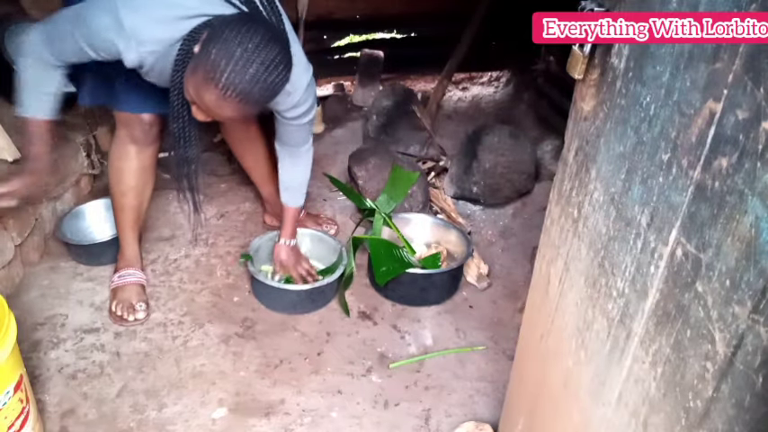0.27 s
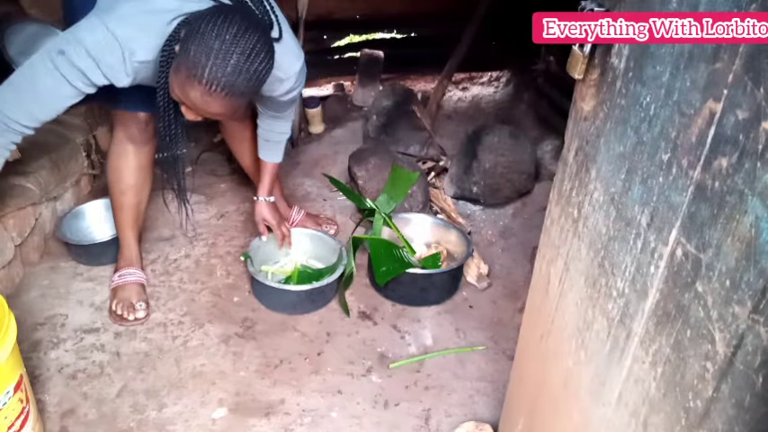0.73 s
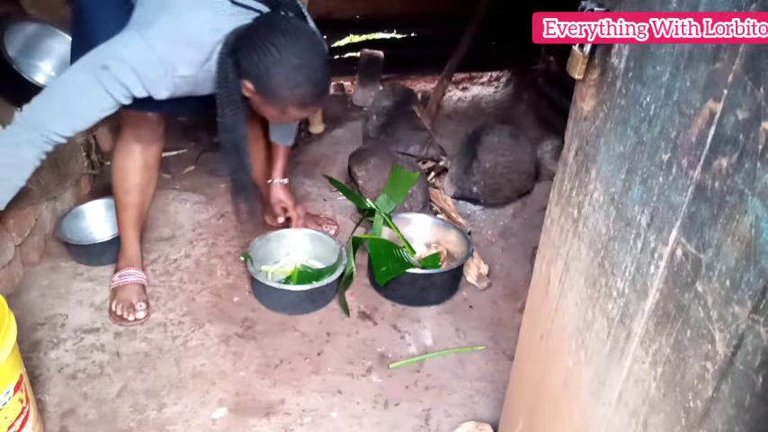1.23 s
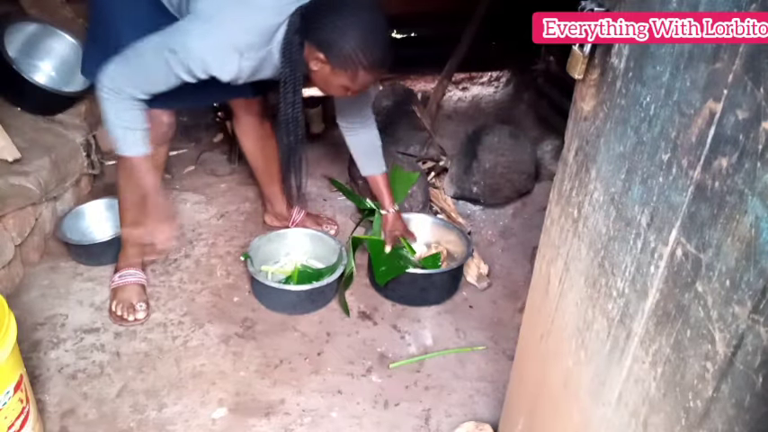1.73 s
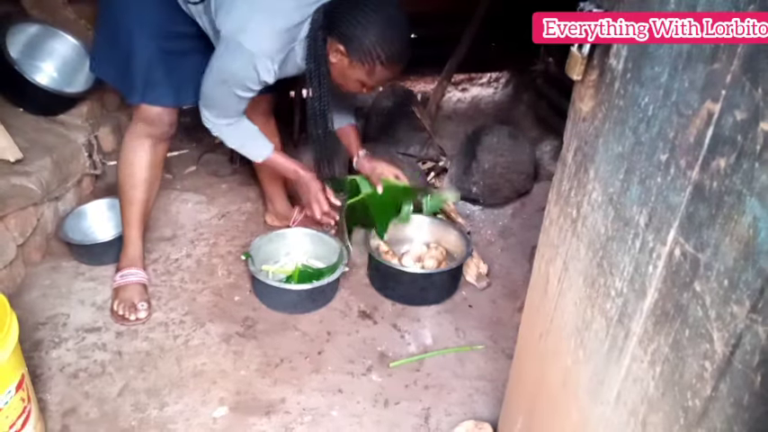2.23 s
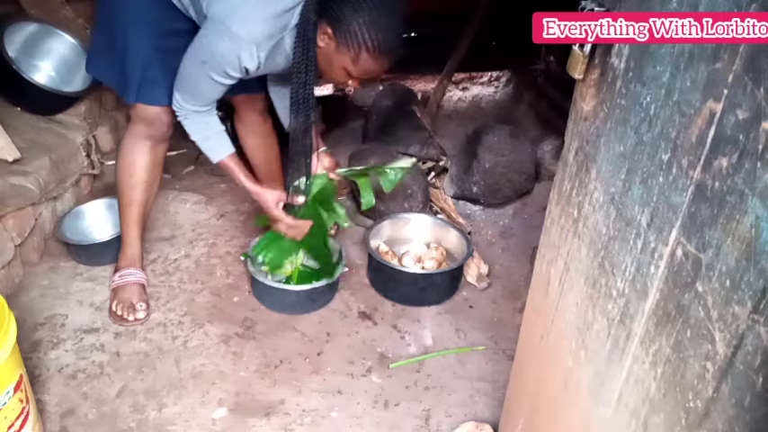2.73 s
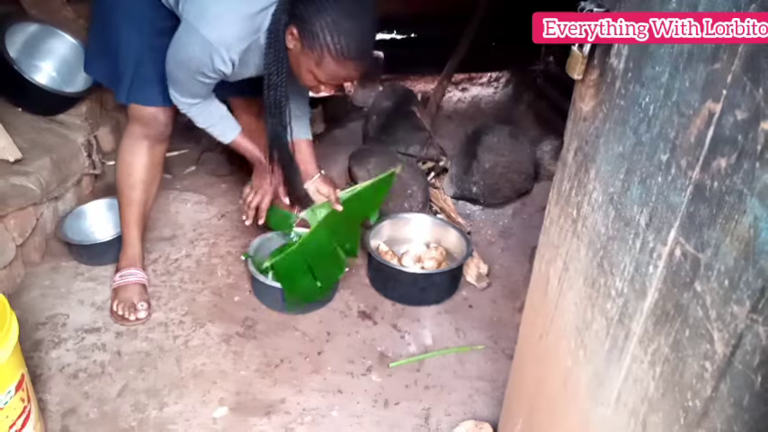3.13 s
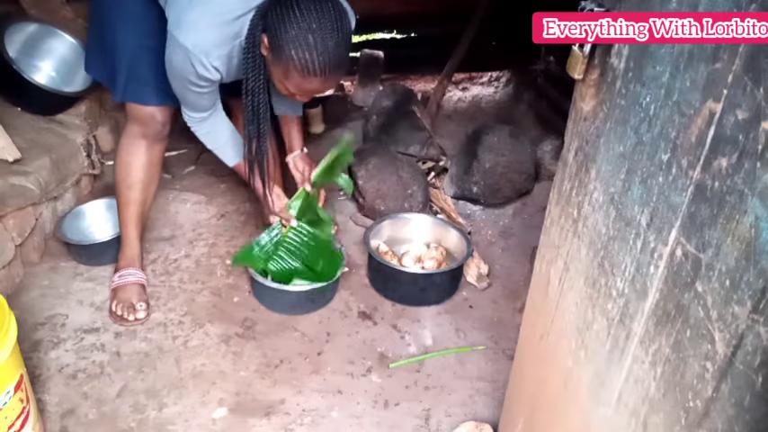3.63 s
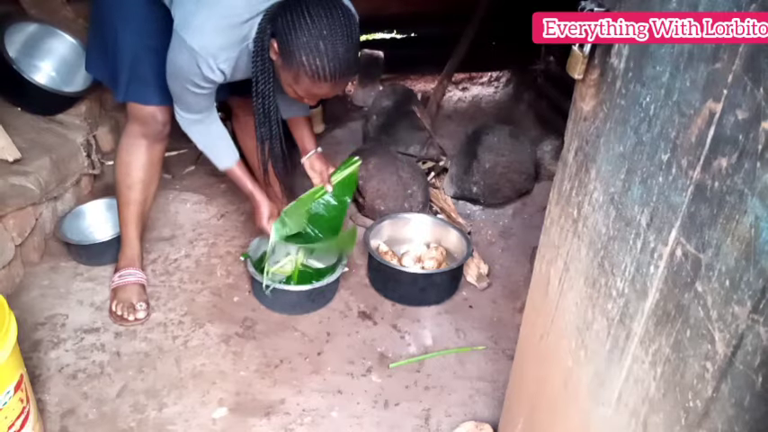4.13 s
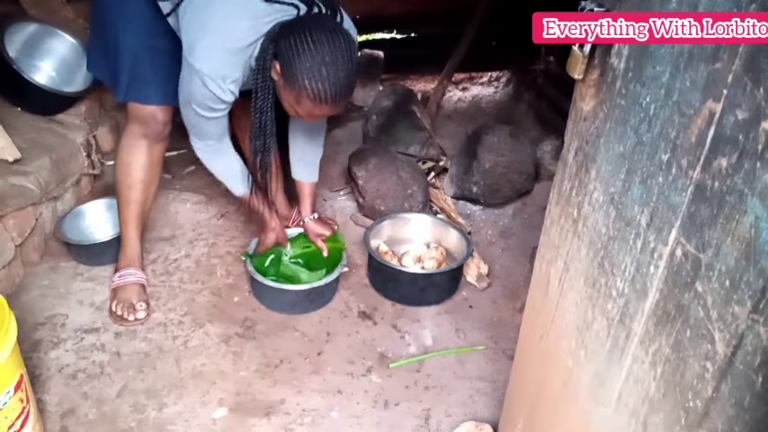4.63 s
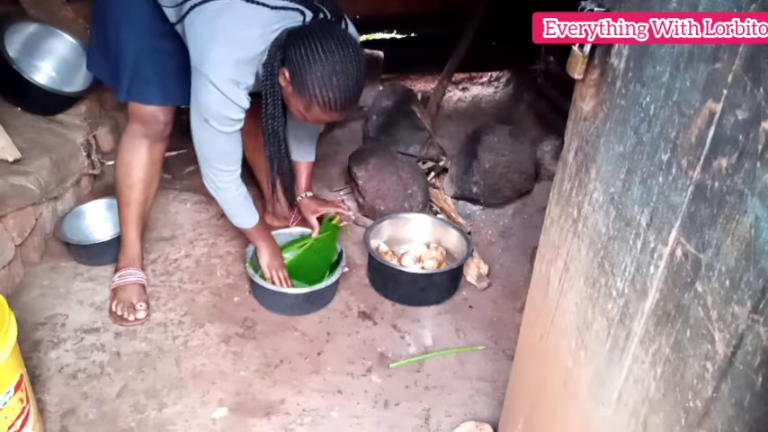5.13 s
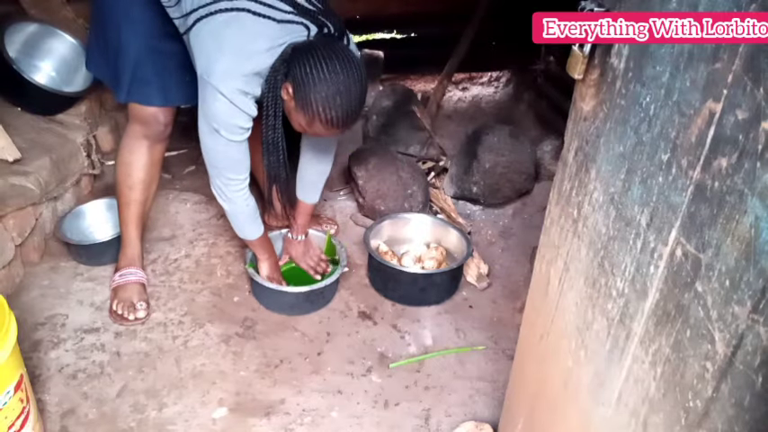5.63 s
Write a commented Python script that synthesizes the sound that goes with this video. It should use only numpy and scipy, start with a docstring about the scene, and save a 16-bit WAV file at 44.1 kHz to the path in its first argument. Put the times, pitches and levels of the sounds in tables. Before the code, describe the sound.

Close up in a small, quiet kitchen, a fresh leaf crinkles, a metal pot's rim is lightly rubbed, and a few knocks ring the pot briefly. A small bird outside chirps a faint, quick series of falling notes. Large leaves rustle softly, then are folded and pressed into the pot, their ribs snapping more and more often until a last loud crunch. A faint hiss lies behind.

```python
"""A small kitchen, the microphone close to an aluminium pot on the floor, a faint hiss behind it.
Fresh banana leaves are lifted and crinkle; the pot's rim is rubbed, and a few knocks ring the pot.
At two seconds a small bird out in the yard chirps a quick falling series over a thin high tone.
The leaves are folded and pressed into the pot, ribs snapping, while a faint low hum sets in.
Just before six seconds a last push crushes them."""
import sys
import numpy as np
from scipy import signal
from scipy.fft import rfft, irfft
from scipy.io import wavfile
from scipy.ndimage import uniform_filter1d

SR = 44100
rng = np.random.default_rng(int(sys.argv[2]) if len(sys.argv) > 2 else 0)


def unload_audio(sound):
    """Save the sound as a 16-bit wav file, at the path given as the first command line argument."""
    columns = np.transpose(np.atleast_2d(sound))
    # keep every value between -1 and 1, then stretch to whole-number steps
    steps = np.round(np.clip(columns, -1, 1) * 32767)
    wavfile.write(sys.argv[1], SR, steps.astype(np.int16))


N = 259289
TIME = np.arange(N) / SR


def undb(db):
    """Decibels to gain."""
    return 10 ** (np.asarray(db) / 20)


def unit(x):
    """Scale to rms 1."""
    return x / np.sqrt(np.mean(x ** 2))


def peak_level(x, db):
    """Scale so that the loudest 4 ms have this level."""
    return x * undb(db) / np.sqrt(uniform_filter1d(x ** 2, 176).max())


def level_curve(table):
    """Gain along straight lines between (time [s], level [dB]) points."""
    return undb(np.interp(TIME, *np.transpose(table)))


def add(out, start, x):
    """Mix a sound in at a time in seconds."""
    i = max(int(start * SR), 0)
    out[i:i + len(x)] += x[:max(N - i, 0)]


def cut(x, hz, kind):
    """Second-order low-pass or high-pass."""
    return signal.sosfilt(signal.butter(2, hz, kind, fs=SR, output="sos"), x)


def colour(points, size=2048):
    """Minimum-phase response of unit energy with the given spectral shape."""
    hz, db = np.transpose(points)
    bins = np.maximum(np.arange(size // 2 + 1) * SR / size, 1)
    gain = undb(np.interp(np.log(bins), np.log(hz), db))
    cepstrum = irfft(np.log(gain))
    cepstrum[1:size // 2] *= 2
    cepstrum[size // 2 + 1:] = 0
    response = irfft(np.exp(rfft(cepstrum)))
    return response / np.linalg.norm(response)


def through(x, response):
    """Pass a sound through a response, keeping its length."""
    return signal.fftconvolve(x, response)[:len(x)]


def resonance(hz, decay_s):
    """Response of one damped mode."""
    t = TIME[:SR // 4]
    return np.exp(-t / decay_s) * np.sin(2 * np.pi * hz * t)


def narrow_noise(hz, decay_s):
    """Noise passed twice through one resonance: an unsteady tone."""
    ring = resonance(hz, decay_s)
    return unit(through(through(rng.standard_normal(N), ring), ring))


def walk(rate):
    """Smooth random wander with a spread near 1."""
    hold = int(SR / rate)
    steps = np.repeat(rng.standard_normal(N // hold + 1), hold)
    return 1.3 * uniform_filter1d(uniform_filter1d(steps, hold), hold)[:N]


def flicker(x, depth_db, rate):
    """Narrow bands swell and fade on their own, so the colour keeps shifting."""
    spectrum, bins = rfft(x, 2 ** 18), np.fft.rfftfreq(2 ** 18, 1 / SR)
    edges = np.geomspace(200, 8000, 22)
    for lo, hi in zip(edges, edges[1:]):
        band = irfft(spectrum * ((bins >= lo) & (bins < hi)))[:N]
        x = x + band * (undb(depth_db * walk(rate)) - 1)
    return x


def gesture(start, swell, fade):
    """A smooth swell, then 60 dB of decay over the fade; times in seconds."""
    t = TIME - start
    rise = np.sin(np.pi / 2 * np.clip(t / swell, 0, 1))
    return rise * 1000 ** (-np.maximum(t - swell, 0) / fade)


def gestures(rows):
    """Joint envelope of (start [s], swell [s], fade [s], level [dB]) rows; their powers add."""
    return np.sqrt(sum((undb(db) * gesture(*timing)) ** 2 for *timing, db in rows))


def grains(rate, spread_db, size):
    """Tiny fractures at random moments: many small, a few large."""
    chance = rng.random((size, 2))
    strength = np.minimum(rng.exponential(size=size), 4)
    return (chance[:, 0] < rate / SR) * np.sign(chance[:, 1] - .5) * undb(spread_db * strength)


def burst(length, rate, spread_db):
    """A first break and a dying run of smaller ones, together a broad crack."""
    t = TIME[:SR // 3]
    first = rng.standard_normal(len(t)) * np.exp(-t / 0.0013)
    run = grains(rate, spread_db, size=len(t)) * np.exp(-t / length)
    spectrum = rfft(unit(first) + unit(run + first / 10))
    # a brittle break hardly favours any pitch, so its peaks and dips are shallow
    flattened = irfft(spectrum / np.sqrt(np.abs(spectrum)), len(t))
    return unit(flattened * np.exp(-t / .1))


def mic_path(wet_db=1.5, t60_low=0.21, t60_high=0.15):
    """Direct sound, then a fresh pattern of reflections; by default the kitchen's floor and near walls."""
    t = TIME[:SR // 3]
    low = cut(rng.standard_normal(len(t)), 2500, "low") * 1000 ** (-t / t60_low)
    high = cut(rng.standard_normal(len(t)), 2500, "high") * 1000 ** (-t / t60_high)
    tail = (low + high) * (1 - np.exp(-t / .003))
    response = undb(wet_db) * tail / np.linalg.norm(tail)
    response[0] += 1
    return response


def roaming(x, hop=8192):
    """A source moves before the microphone: its reflections fade from one spot to the next."""
    out, fade = np.zeros(N), np.sin(np.pi * np.arange(2 * hop) / (2 * hop))
    padded = np.pad(x, (hop, 2 * hop))
    for i in range(0, N + hop, hop):
        piece = signal.fftconvolve(padded[i:i + 2 * hop] * fade, mic_path())
        add(out, (i - hop) / SR, piece[max(hop - i, 0):])
    return out


# spectrum of the background hiss: (frequency [Hz], relative level [dB])
HISS_SPECTRUM = [(20, -35.5), (45, -6.5), (65, -2.5), (130, -0.5), (220, -9), (330, -13.5), (640, -29),
                 (860, -6.5), (1350, -21.5), (2100, -23.5), (5200, -23), (8000, -31.5), (16000, -37)]
# swells of the low rumble: (time [s], level [dB])
RUMBLE_LEVELS = [(0, -80), (1.55, -80), (1.85, -65), (2.6, -81.5), (3.15, -67), (3.6, -81), (4.6, -85)]


def background():
    """A faint hiss whose narrow bands flicker, an uneven rumble and a wavering hum that sets in late."""
    rumble = narrow_noise(hz=132, decay_s=0.013) * level_curve(RUMBLE_LEVELS)
    hum_gain = np.clip((TIME - 4.63) / 0.28, 0, 1) * undb(-67 + 2.0 * walk(9.7))
    hum_hz = 151.6 * (1 + 0.014 * walk(12))
    hum = hum_gain * np.sin(2 * np.pi * np.cumsum(hum_hz) / SR)
    hiss = unit(through(rng.standard_normal(N), colour(HISS_SPECTRUM, size=8192)))
    return rumble + hum + flicker(hiss, depth_db=3.0, rate=25) * undb(-72)


def whistle():
    """A thin, fluttering high tone swells and fades behind the bird."""
    envelope = undb(-74.5) * gesture(start=1.85, swell=0.38, fade=1.4)
    return narrow_noise(hz=2750, decay_s=0.0016) * envelope


# the bird's calls: (time [s], base level [dB], length [s], final pitch [Hz])
BIRD_CHIRPS = [(2.056, -64.5, .012, 3130), (2.144, -64.5, 0.011, 3090), (2.237, -63, 0.011, 2990),
               (2.326, -64, 0.013, 2970), (2.418, -62.5, .012, 2960), (2.525, -63, .012, 2950),
               (2.620, -64.5, .012, 2940), (2.687, -65.5, 0.017, 3680), (2.72, -64.5, .028, 3550)]


def bird(start_hz=5650, throat_hz=4090, throat_width_hz=790, throat_db=7, fade_db=4.5):
    """Out in the echoing yard, each chirp dives from one pitch and levels out, loudest in mid-fall."""
    out = np.zeros(N)
    for start, db, length, end_hz in BIRD_CHIRPS:
        progress = np.linspace(0, 1, int(length * SR))
        rasp = 0.031 * unit(uniform_filter1d(rng.standard_normal(len(progress)), 24))
        hz = (end_hz + (start_hz - end_hz) * (1 - progress) ** 1.6) * (1 + rasp)
        throat = undb(throat_db * np.exp(-((hz - throat_hz) / throat_width_hz) ** 2))
        swell = np.abs(np.sin(np.pi * progress)) ** 0.066 * throat * undb(-fade_db * progress)
        chirp = undb(db) * swell * np.sin(2 * np.pi * np.cumsum(hz) / SR)
        yard = mic_path(wet_db=4.5, t60_low=0.53, t60_high=0.59)
        add(out, start, signal.fftconvolve(chirp, yard))
    return out


# partials of the metal rim: (frequency [Hz], relative level before the tilt [dB])
RIM_PARTIALS = [(1750, 2.5), (2420, 4.5), (3700, 0), (4450, 0), (5250, -4), (6950, -0.5), (8750, -10)]
# rubs along the rim: (start [s], swell [s], fade [s], level [dB], tilt [dB/octave])
RIM_STROKES = [(0.435, 0.036, 0.43, -66.5, 7), (0.53, 0.052, 1, -64, -2.5)]


def rim_rubs():
    """Light friction keeps a few high partials of the rim ringing, heard close and dry."""
    out, lowest_hz = np.zeros(N), RIM_PARTIALS[0][0]
    for start, swell, fade, db, tilt_db in RIM_STROKES:
        ring = sum(undb(gain_db + tilt_db * np.log2(hz / lowest_hz)) * resonance(hz, decay_s=0.0029)
                   for hz, gain_db in RIM_PARTIALS)
        out += unit(through(rng.standard_normal(N), ring)) * undb(db) * gesture(start, swell, fade)
    return out


# hollow bumps as the leaf is moved and pushed down: (time [s], level [dB], pitch [Hz])
LEAF_BUMPS = [(0.01, -46, 1245), (0.559, -63, 446), (2.81, -65, 240), (2.95, -62.5, 936), (2.975, -60, 216),
              (3.229, -67, 488), (3.379, -66.5, 410), (3.59, -64, 437), (4.157, -57.5, 977),
              (4.22, -53.5, 495), (4.386, -56.5, 395), (5.266, -57, 377), (5.304, -51.5, 966),
              (5.449, -56, 390), (5.552, -60, 388), (5.599, -49.5, 410), (5.814, -40.5, 350)]


def leaf_bumps():
    """Down in the pot, a soft push sounds the air space under the leaf for a few cycles."""
    out, t = np.zeros(N), TIME[:SR // 3]
    for start, db, hz in LEAF_BUMPS:
        thud = t * np.exp(-t / 0.0036) * np.sin(2 * np.pi * hz * t)
        add(out, start, peak_level(through(thud, mic_path()), db))
    return out


# modes of the aluminium pot: (frequency [Hz], relative level [dB], t60 [s])
POT_MODES = [(343, -22, 0.089), (428.4, -13.5, 0.12), (649, -14.5, 0.13), (768, -8, .13),
             (824.6, 2.5, 0.15), (881, -8, 0.22), (1073, -11, 0.11), (1325, -11, 0.12), (1466, -9, 0.096),
             (1696, -15.5, 0.067), (1938, -10.5, 0.069)]
# spectra of the contact crack and the pot's hollow: (frequency [Hz], relative level [dB])
CRACK_SPECTRUM = [(40, -47), (200, -11), (400, 1.5), (600, -27), (1000, 9.5), (1600, 6.5), (2600, -5),
                  (3400, -1.5), (4400, -5), (6000, -1), (9000, -10.5), (13000, -26.5), (16000, -25)]
HOLLOW_SPECTRUM = [(50, -53), (170, -4.5), (260, -13), (340, 4), (420, 3), (540, -7), (1200, -28.5),
                   (5000, -87)]
# blows on the pot: (time [s], level [dB], crack re ring [dB], rattle length [s], thud re ring [dB])
POT_KNOCKS = [(0.6459, -28, 6, 0.0084, -14), (0.658, -28.5, -6, 0.0076, -9.5), (0.679, -33, -5, 0.0028, -4),
              (0.752, -49, 7, 0.0035, -7.5), (0.760, -41, -9.5, .0023, -16), (0.918, -48.5, -10, 0.013, 0),
              (1.1564, -38.5, -2.5, 0.0067, -12), (1.405, -63.5, -32, .005, -10), (3.16, -61, -15, .01, -9),
              (4.903, -57.5, -4, 0.0069, -6), (4.966, -53.5, -9, 0.0051, -7.5)]


def pot_knocks(detune=0.0087):
    """On the floor near the microphone, a blow cracks, thuds and rings the pot; its filling damps it."""
    out, t = np.zeros(N), TIME[:SR // 3]
    for start, db, crack_db, length, thud_db in POT_KNOCKS:
        ring = np.zeros(len(t))
        for hz, gain_db, t60 in POT_MODES:
            hz *= 1 + detune * rng.standard_normal()
            ring += undb(gain_db) * 1000 ** (-t / t60) * np.sin(2 * np.pi * hz * t)
        # reflections build the ring up over the first cycles and make it beat unevenly
        ring = unit(ring * (1 - np.exp(-t / 0.0026)) * undb(2.0 * walk(114)[:len(t)]))
        contact = through(burst(length, rate=3700, spread_db=0.5), mic_path())
        crack = unit(through(contact, colour(CRACK_SPECTRUM)))
        # the lows come late and stay
        thud = unit(through(contact * (1 - np.exp(-t / 0.011)), colour(HOLLOW_SPECTRUM)))
        add(out, start, peak_level(ring + undb(crack_db) * crack + undb(thud_db) * thud, db))
    return out


# spectra of leaf crinkling, flexing and rubbing in the pot: (frequency [Hz], relative level [dB])
CRINKLE_SPECTRUM = [(200, -77), (700, -24), (1500, -11.5), (2500, -7), (3600, -2.5), (6300, -1), (8000, -6),
                    (11000, -13), (14000, -21), (16000, -12.5)]
FLEX_SPECTRUM = [(40, -44), (220, -31.5), (350, -7.5), (600, -4), (950, 0), (1400, 1), (2400, 0),
                 (4000, -8.5), (9000, -55)]
RUB_SPECTRUM = [(40, -51.5), (130, 0.5), (250, -4), (420, 0.5), (620, -6.5), (880, 0), (1100, -3.5),
                (1800, -16), (5000, -61.5)]
# leaf over leaf: (start [s], swell [s], fade [s], dry crinkle level [dB], flex re crinkle [dB])
LEAF_STROKES = [(0.0, 0.004, 0.14, -40.5, -4), (0.099, 0.054, 0.51, -62.5, -2.5),
                (1.755, 0.044, 0.5, -69, 2), (1.795, 0.039, 0.54, -58, -6), (1.90, 0.065, 1, -67.5, -4),
                (2.06, 0.036, 0.73, -69, -1.5), (2.43, 0.12, 0.56, -69.5, -7.5),
                (2.58, 0.031, 0.14, -65, -13), (2.92, 0.04, 0.86, -76.5, -3),
                (3.085, 0.029, 0.64, -68, 1.5), (3.15, 0.035, 0.42, -68, 3.5),
                (3.575, 0.019, 0.27, -74, 1.5), (3.89, 0.021, .45, -71, 0.5),
                (4.005, 0.038, 0.19, -64.5, -6), (4.37, 0.12, 0.12, -64, 1), (4.65, 0.062, 0.26, -61, -5.5),
                (4.891, 0.026, 1, -69.5, 2.5)]
# leaf along the hollow of the pot: (start [s], swell [s], fade [s], dry level [dB])
POT_SLIDES = [(0.0, 0.0075, 0.17, -55), (0.1, 0.088, 0.87, -74.5), (0.33, 0.076, 0.91, -75.5),
              (1.55, 0.16, 1.7, -79), (2.45, 0.55, 0.44, -79), (3.12, 0.044, 1.34, -70),
              (3.75, 0.31, 1.7, -77.5), (4.21, .025, 0.22, -61), (5.47, 0.05, .4, -62),
              (5.8, 0.027, 0.16, -53)]
# hands pressing the leaf into the pot: (time [s], dry crinkle level [dB])
PRESS_LEVELS = [(3.5, -100), (3.66, -77.5), (4.3, -71), (4.87, -74), (5.03, -66.5), (5.35, -71.5),
                (5.43, -58.5), (5.74, -53.5), (5.83, -43), (5.88, -63.5)]


def leaf_rustle(press_flex_db=-4, press_rub_db=-17, hard_press_db=-47.5):
    """Close up, leaf slides on leaf: fine crinkles, the blade's duller flexing, friction in the pot."""
    press = level_curve(PRESS_LEVELS)
    crinkle = np.hypot(gestures(row[:4] for row in LEAF_STROKES), press)
    stroke_flex = gestures((*timing, db + flex_db) for *timing, db, flex_db in LEAF_STROKES)
    flex = np.hypot(stroke_flex, press * undb(press_flex_db))
    rub = np.hypot(gestures(POT_SLIDES), press * undb(press_rub_db))
    # each tiny fracture flutters for a fraction of a millisecond
    flutter = np.exp(-TIME[:256] / 0.00067)
    impulses = np.abs(grains(rate=730, spread_db=4.0, size=N))
    fractures = unit(through(impulses, flutter) * rng.standard_normal(N))
    jerk = undb(walk(40))
    layers = (crinkle, CRINKLE_SPECTRUM, .6), (flex, FLEX_SPECTRUM, .7), (rub, RUB_SPECTRUM, .9)
    out = np.zeros(N)
    for envelope, spectrum, slide in layers:
        contact = unit((fractures + slide * rng.standard_normal(N)) * jerk)
        out += through(envelope * contact, colour(spectrum))
    # hard pressing brings out the top octave; the minus joins two bands of opposite phase
    force = np.clip(np.sqrt(crinkle / undb(hard_press_db)), 0, 1.2)
    out = cut(out, 10000, "low") - force * cut(out, 10000, "high")
    # the bending blade keeps changing its resonances
    return roaming(flicker(out, depth_db=2.0, rate=24))


# leaf ribs breaking: (time [s], level [dB], blade's flex re rib [dB], tear length [s])
RIB_SNAPS = [(0.019, -40.5, -5, 0.0031), (0.1365, -51.5, -22, 0.0053), (0.353, -62, -22, .0045),
             (1.9026, -37.5, -1.5, 0.00078), (4.1028, -56, -13, 0.0027), (4.1561, -39, -13.5, 0.004),
             (4.2178, -42, 2, 0.0068), (4.515, -36.5, -8, 0.0021), (4.6369, -43.5, -5.5, 0.023),
             (4.9661, -34.5, -13.5, 0.0066), (5.071, -38, -13.5, 0.0035), (5.1159, -41.5, -15, 0.0032),
             (5.146, -39.5, -11.5, .002), (5.2145, -42, -15, .004), (5.3056, -36.5, -7.5, 0.0043),
             (5.384, -36.5, -4.5, .0016), (5.482, -46, -17, .005), (5.511, -39.5, -8, .003),
             (5.6596, -38, -15, 0.0028), (5.7352, -37, -10, 0.0027), (5.764, -29, -18, 0.0018),
             (5.787, -31.5, -8, 0.01), (5.8085, -23.5, 0.5, 0.0048), (5.828, -26, 1.5, 0.0077),
             (5.8526, -25, -2.5, 0.0017)]


def rib_snaps(lifted_until_s=4.2):
    """In the foreground, a rib gives way in a run of fractures that shakes the blade; each has its tone."""
    out = np.zeros(N)
    for start, db, flex_db, length in RIB_SNAPS:
        tear = burst(length, rate=8300, spread_db=1.0)
        rib_spectrum = [(hz, gain_db + 0.5 * rng.standard_normal()) for hz, gain_db in CRINKLE_SPECTRUM]
        rib = through(tear, colour(rib_spectrum))
        blade = through(burst(length, rate=5000, spread_db=1.0), colour(FLEX_SPECTRUM))
        # held up clear of the pot, the leaf sounds drier
        room = mic_path(wet_db=-.5 if start < lifted_until_s else 1.45, t60_low=0.23, t60_high=0.14)
        add(out, start, peak_level(through(rib + undb(flex_db) * blade, room), db))
    return out


def scene():
    """From one spot in the kitchen: leaves and pot close by, the bird outside, a faint hiss behind."""
    handling = leaf_rustle() + rib_snaps() + pot_knocks() + leaf_bumps()
    return (handling + bird() + rim_rubs() + background() + whistle())[None]


def record(dry, port_hz=15200, top_hz=15600):
    """One microphone drops the deepest bass; its port rings at the very top, just under the cut-off."""
    dry = cut(dry, 45, "high")
    port = signal.lfilter(*signal.iirpeak(port_hz, Q=14, fs=SR), dry)
    return signal.sosfilt(signal.ellip(10, .2, 70, top_hz, fs=SR, output="sos"), dry + 2.0 * port)


dry = scene()
out = record(dry)
unload_audio(out)
```